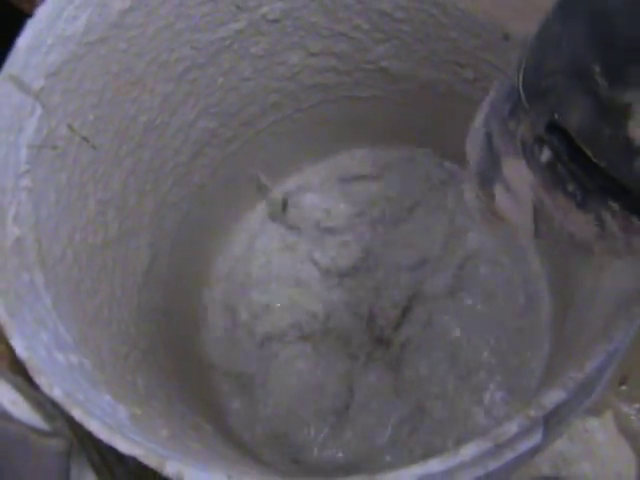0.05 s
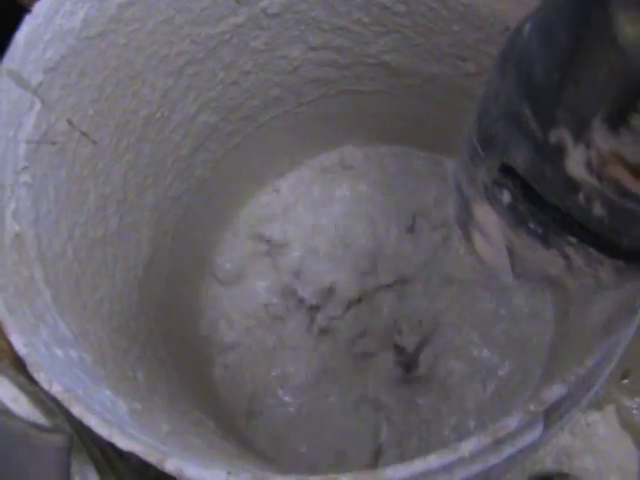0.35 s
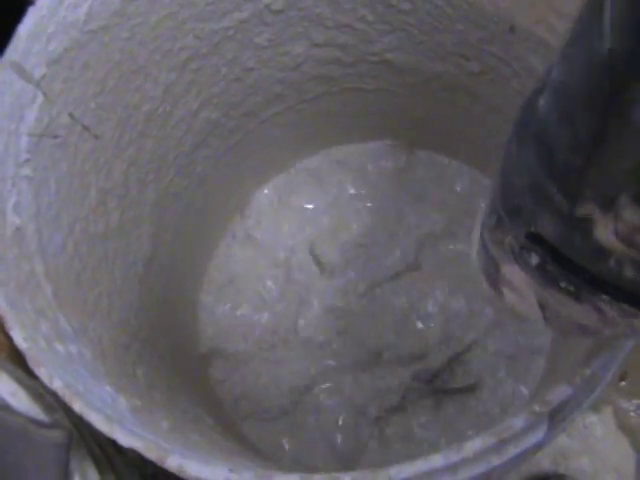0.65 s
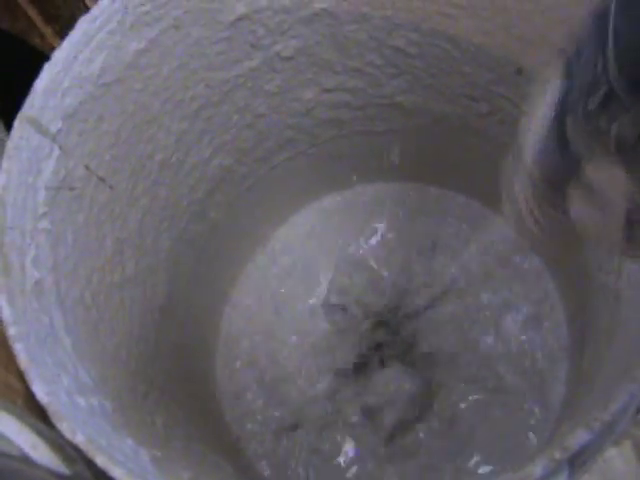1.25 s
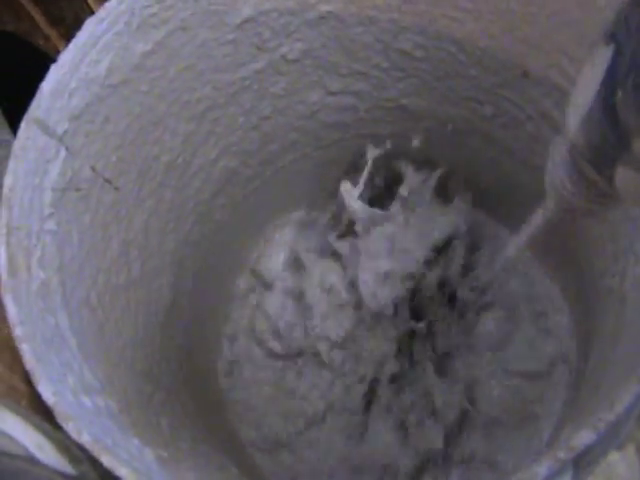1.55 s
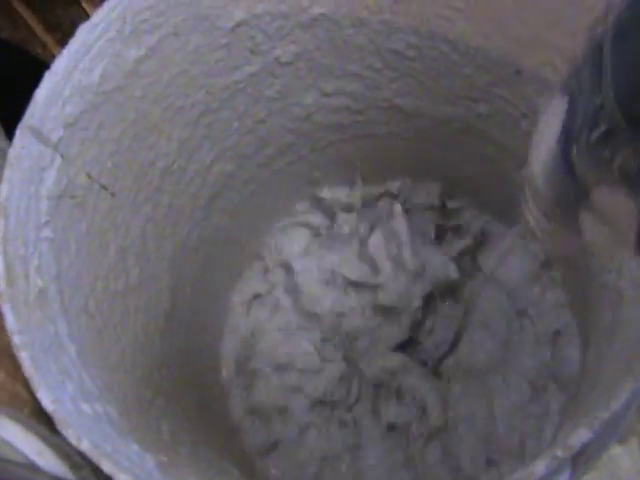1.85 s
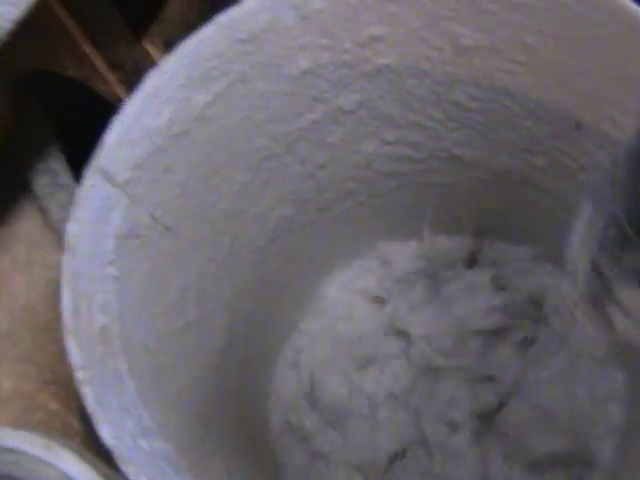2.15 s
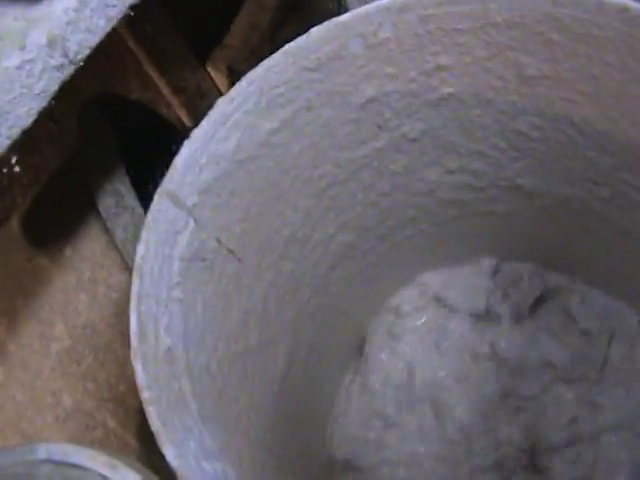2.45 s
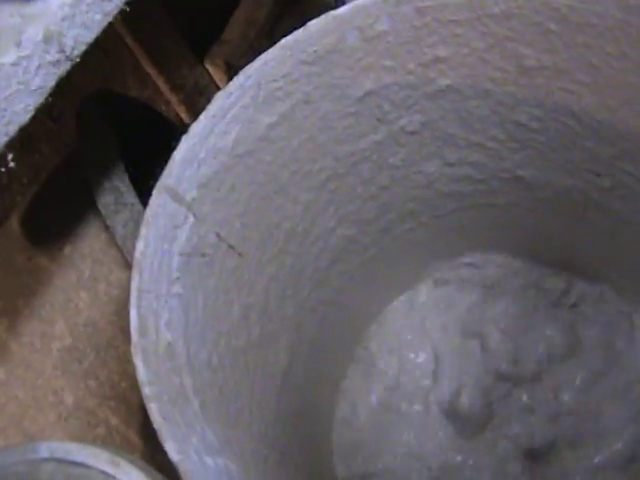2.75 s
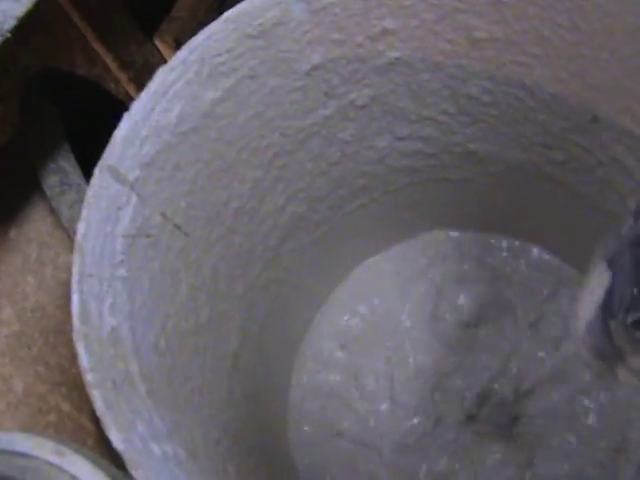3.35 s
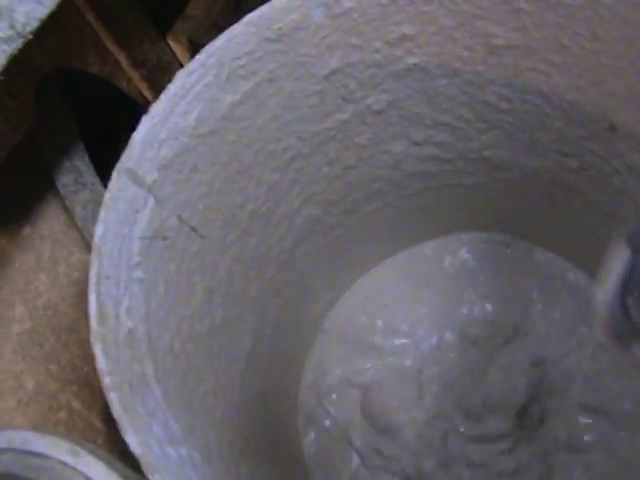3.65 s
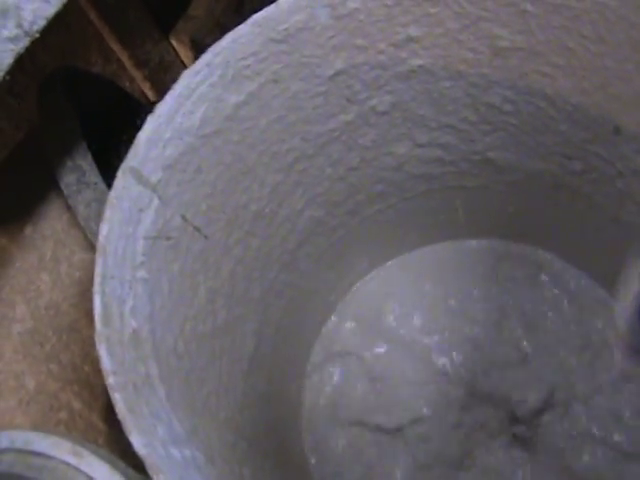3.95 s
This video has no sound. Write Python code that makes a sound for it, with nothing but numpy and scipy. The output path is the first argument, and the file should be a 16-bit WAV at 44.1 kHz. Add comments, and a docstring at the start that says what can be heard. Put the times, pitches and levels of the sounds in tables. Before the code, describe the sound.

Loud electric mixer humming and whining over the wet slops of thick glaze in a bucket.

```python
"""A steady motor hum with hiss and a pulsing gear whine, over booming and wet slops:
a hand-held electric mixer at full speed, stirring thick glaze in a plastic bucket.
Unbalance makes the hum; the fan hisses and whistles, and its air rings the housing.
The gears whine, buzz and rasp, binding at the same places in every turn of the paddle shaft.
The paddle keeps the bucket booming; air pockets open in the churned glaze as slops."""
import sys
import numpy as np
from scipy.fft import rfft, irfft
from scipy.io import wavfile
from scipy.ndimage import uniform_filter1d

SR = 44100
rng = np.random.default_rng(int(sys.argv[2]) if len(sys.argv) > 2 else 0)


def wav_record(signal):
    """Record a signal, one row per channel, as 16-bit PCM in the file named by sys.argv[1]."""
    frames = np.transpose(np.atleast_2d(signal))
    bounded = np.clip(frames, -1, 1)
    # unit amplitude maps onto the largest positive 16-bit level
    quanta = np.round(bounded * 32767).astype(np.int16)
    wavfile.write(sys.argv[1], SR, quanta)


N = 176400
T = np.arange(N) / SR
HZ = np.maximum(np.arange(N // 2 + 1) * SR / N, 1)
GEAR_RATIO, PINION_TEETH = 18.58, 9

# motor speed: time_s, speed_hz
MOTOR_SPEED = [(0, 379.3), (.2, 379.6), (.55, 381.3), (.8, 381.2), (1.1, 380.9), (1.4, 382.6),
               (1.75, 382.9), (1.95, 382.2), (2.25, 382.9), (2.8, 381.9), (3.3, 380), (3.6, 380.8),
               (4, 380.8)]
# hum lines: motor_multiple, shaft_multiple
HUM_ORDERS = [(0, 2), (0, 3), (0, 4), (1, 0), (2, -1), (2, 0), (2, 1), (3, 0)]
# same lines: level_db, pan_db (pan is left minus right throughout)
HUM_LEVELS = [(-62, 6), (-61, 17), (-62, 19), (-40.5, -18), (-42, -5.5), (-51, -21), (-42, -9), (-41.5, 9)]
# hum swell: time_s, gain_db
HUM_SWELL = [(0, 1), (.76, -1.5), (1.55, 3.5), (2.25, 1.5), (3.25, -2.5), (3.5, 0), (4, 1)]

# gear binds, main one first: place_turns, width_turns, whine_gain_db, rasp_share
BINDS = [(0.42, 0.059, 1, 0.13), (0.27, 0.047, -11, 0.17), (0.84, 0.068, -22, 0.26),
         (0.066, 0.088, -33, 0.25)]
# whine at the main bind: time_s, gain_db
WHINE_ENVELOPE = [(0, -21), (.3, -20), (.7, -22), (.95, -22), (1.25, -15.5), (1.85, -17), (2.2, -14.5),
                  (2.65, -17.5), (3.2, -22), (3.55, -19.5), (4, -23)]
# gearbox buzz: time_s, level_db
BUZZ_ENVELOPE = [(0, -23.5), (.5, -23.5), (1.1, -27), (1.7, -29.5), (2.4, -26.5), (3.1, -32), (4, -30)]
# gearbox resonances: pitch_hz, width_hz, gain_db
GEARBOX_MODES = [(3042, 58, -2), (3060, 180, -9), (3335, 250, -1), (3470, 200, -6), (4120, 360, -3)]
# gear rasp and fan hiss: time_s, gain_db
RASP_ENVELOPE = [(0, -14.5), (.35, -14), (.7, -14.5), (1.1, -14.5), (1.85, -14), (2.2, -15.5), (3.0, -15),
                 (3.6, -15), (4, -15)]
# their spectrum: freq_hz, gain_db
RASP_SPECTRUM = [(1410, -12), (2400, -5), (2830, -5.5), (2970, -4.5), (3210, -5.5), (3340, -5),
                 (3420, -1.5), (3560, -3.5), (3640, -3), (3760, -3.5), (4570, -4), (5390, -5.5),
                 (7500, -4.5), (10100, -11), (11600, -16.5), (13100, -17.5), (13800, -24), (14900, -23),
                 (15700, -22)]

# fan whistle: time_s, level_db
WHISTLE_ENVELOPE = [(0, -33), (.5, -30), (.65, -43), (1.15, -36), (1.33, -27.5), (1.55, -31), (1.8, -27),
                    (1.95, -36), (2.4, -48), (4, -46)]
# cooling air: time_s, gain_db
AIR_ENVELOPE = [(0.0, -22.5), (0.02, -22.5), (0.98, -22), (2.35, -22.5), (3.58, -21), (4.0, -23)]
# its spectrum: freq_hz, gain_db
AIR_SPECTRUM = [(470, -29), (800, -0.5), (910, -3.5), (977, 0.5), (1040, -2), (1130, -2.5), (1560, 1.5),
                (1800, -1), (1960, 0), (2170, -3.5), (2500, 2.5), (3250, -18), (5500, -120)]
# housing resonances: pitch_hz
HOUSING_HZ = [990, 1165, 1570, 2014, 5010, 7550, 15250]
# same resonances: width_hz, level_db, pan_db
HOUSING_MODES = [(43, -47.5, -14), (97, -36.5, -7), (250, -47, -19), (30, -36.5, -12), (70, -35.5, -12),
                 (600, -34, -2), (220, -52, 0)]

# bucket resonances: pitch_hz, width_hz, gain_db
BUCKET_MODES = [(138.3, 11.6, -16), (177.3, 14.7, -0.5), (196.1, 24, -5.5), (220.7, 15.4, -11.5)]
# bucket boom: time_s, gain_db
BOOM_ENVELOPE = [(0, -19.5), (.4, -21), (.8, -23), (1.3, -21.5), (1.8, -20.5), (2.2, -19), (2.6, -20.5),
                 (2.95, -23.5), (3.25, -17.5), (3.6, -21.5), (4, -21.5)]
# paddle bites (+) and slips (-): time_s, gain_db
SURGES = [(.1, 4), (.156, -4), (.185, 3), (.25, -4), (.284, 3), (.631, -16), (.882, 3), (.977, -11),
          (1.097, 5), (1.13, -2.5), (1.258, 4), (1.365, -5), (1.463, 5), (1.516, -5), (1.664, 5.5),
          (1.713, -4), (1.747, 4.5), (1.834, -9), (1.905, 5.5), (2.03, -8), (2.085, 3), (2.134, 6.5),
          (2.17, -3), (2.21, 6), (2.52, -6), (2.734, -10), (2.86, 4), (2.968, -3), (3.24, 4.5),
          (3.453, -3.5), (3.487, 3), (3.744, 7), (3.797, -4)]

# churning glaze: time_s, gain_db
CHURN_ENVELOPE = [(0, -33.5), (.8, -34), (1.3, -32), (1.7, -30.5), (2.1, -32.5), (2.5, -32.5), (2.75, -31),
                  (3.2, -33), (4, -31)]
# its spectrum: freq_hz, gain_db
CHURN_SPECTRUM = [(25, -26), (70, -20), (110, -11), (260, -1), (340, 0), (450, -2.5), (600, 0.5),
                  (800, -0.5)]
# large slops: start_s, pitch_hz, gain_db
LARGE_SLOPS = [(1.272, 600, -15), (1.5, 570, -13), (1.648, 520, -14), (1.752, 490, -13),
               (2.037, 560, -12.5), (2.077, 474, -14), (2.72, 315, -19), (2.728, 473, -17),
               (2.83, 620, -21), (2.883, 605, -21)]

# left-right likeness of noise: freq_hz, correlation
MIC_CORRELATION = [(60, .68), (160, .93), (270, .85), (360, .58), (550, .78), (850, .75), (1150, .93),
                   (1600, .91), (2600, .8), (4000, .91), (8500, .96), (9900, .92), (11000, .52),
                   (13000, .86), (14600, .35), (15700, .85)]
# balance of noise: freq_hz, pan_db
MIC_PAN = [(60, -1), (120, 24), (260, 0), (420, -6), (620, -3.5), (900, -9.5), (1900, -7), (3800, -4),
           (7500, -3), (10000, -0.5), (15000, -1)]
# left microphone's phase lead: freq_hz, lead_rad
MIC_LEAD = [(85, .4), (170, .1), (280, .15), (380, 1.6), (480, .5), (650, .4), (770, 1.2), (1020, .9),
            (1200, .45), (1800, .6), (2700, .3), (3450, .35), (6000, .15), (10000, -.1), (11000, -1.1),
            (12100, -2.9), (14000, -3.4), (15200, -6)]


def from_db(db):
    """Decibels to gain."""
    return 10 ** (np.asarray(db) / 20)


def unit_rms(x):
    """Scale to RMS 1."""
    return x / np.sqrt(np.mean(np.abs(x) ** 2) + 1e-20)


def in_time(rows):
    """Table value at every sample."""
    return np.interp(T, *np.transpose(rows))


def at_hz(rows):
    """Table value at every FFT bin."""
    hz, value = np.transpose(rows)
    return np.interp(np.log(HZ), np.log(hz), value)


def pan(db):
    """Left and right gains for a level difference."""
    half_db = np.atleast_1d(db) / 2
    return np.array([from_db(half_db), from_db(-half_db)])


def drift(corner_hz):
    """Low-passed random wander, RMS 1."""
    return unit_rms(irfft(rfft(rng.standard_normal(N)) / (1 + (HZ / corner_hz) ** 2), N))


def resonance(hz, width_hz):
    """Noise-driven, steep-sided resonance, RMS 1."""
    detune = (HZ ** 2 - hz ** 2) / (HZ * width_hz)
    return unit_rms(irfft(rfft(rng.standard_normal(N)) / (1 + 1j * detune / np.sqrt(2)) ** 2, N))


def rough_tone(cycles, jitter_rad, jitter_hz, flutter_db):
    """Sine with shaking phase and level, RMS 1."""
    flutter = from_db(flutter_db * drift(150))
    return unit_rms(flutter * np.sin(2 * np.pi * cycles + jitter_rad * drift(jitter_hz)))


def stereo_noise(spectrum, low_hz, high_hz):
    """Shaped noise band at the microphone pair, mid RMS 1."""
    mid, side = rfft(rng.standard_normal((2, N)))
    correlation = np.clip(at_hz(MIC_CORRELATION), -.95, .99)
    side = side * np.sqrt((1 - correlation) / (1 + correlation))
    gain = from_db(at_hz(spectrum)) / np.sqrt((1 + (low_hz / HZ) ** 16) * (1 + (HZ / high_hz) ** 16))
    noise = irfft(np.array([mid + side, mid - side]) * gain * pan(at_hz(MIC_PAN)), N)
    return noise / noise.mean(0).std()


def motor_hum(motor_turns, shaft_turns, waver_db=0.5):
    """Rotor and shaft unbalance: low multiples of both speeds, plus sidebands."""
    lines = 0
    for (motor_multiple, shaft_multiple), (db, pan_db) in zip(HUM_ORDERS, HUM_LEVELS):
        amplitude = np.sqrt(2) * from_db(db + waver_db * drift(1.7))
        cycles = motor_multiple * motor_turns + shaft_multiple * shaft_turns + rng.random()
        lines += pan(pan_db) * amplitude * np.sin(2 * np.pi * cycles)
    return from_db(in_time(HUM_SWELL)) * lines


def bind(shaft_turns, place_turns, width_turns):
    """Smooth load bump, once per shaft turn."""
    offset_turns = (shaft_turns - place_turns + .5) % 1 - .5
    return np.exp(-.5 * (offset_turns / width_turns) ** 2)


def gear_whine(motor_turns, shaft_turns, rise_hz=4, free_db=-38, uneven_db=1.5, pan_db=-8.5):
    """Pinion tooth tone rings the gear wheel; swells at each bind, slightly sharp at the main one."""
    load = sum(from_db(db) * bind(shaft_turns, place, width) for place, width, db, _ in BINDS)
    shaft_hz = np.mean(in_time(MOTOR_SPEED)) / GEAR_RATIO
    twist_cycles = rise_hz / (2 * np.pi * shaft_hz) * np.sin(2 * np.pi * (shaft_turns - BINDS[0][0]))
    tooth_cycles = PINION_TEETH * motor_turns + twist_cycles
    tone = rough_tone(tooth_cycles, jitter_rad=0.3, jitter_hz=70, flutter_db=1.5)
    drive = from_db(free_db) + from_db(in_time(WHINE_ENVELOPE) + uneven_db * drift(15)) * load
    wheel_hz, wheel_width_hz = 3444, 100
    wheel = 1 / (1 + 2j * (HZ - wheel_hz) / wheel_width_hz)
    return pan(pan_db) * irfft(rfft(drive * tone) * wheel, N)


def tooth_load(shaft_turns):
    """Gain on buzz and rasp: 1 running free, more at the binds."""
    return 1 + sum(share * bind(shaft_turns, place, width) for place, width, _, share in BINDS)


def gear_buzz(shaft_turns, pan_db=-7.5):
    """Rattling teeth ring the gearbox, harder at the binds."""
    ring = unit_rms(sum(from_db(db) * resonance(hz, width_hz) for hz, width_hz, db in GEARBOX_MODES))
    return pan(pan_db) * from_db(in_time(BUZZ_ENVELOPE)) * unit_rms(tooth_load(shaft_turns)) * ring


def gear_rasp(shaft_turns, trim_db=-0.61, grit_db=1.22, flutter_db=0.72):
    """Bright, gritty noise of gears, brushes and fan, pulsing with the shaft."""
    grit = from_db(grit_db * drift(400) + flutter_db * drift(46))
    pulse = unit_rms(tooth_load(shaft_turns) * grit)
    hiss = stereo_noise(RASP_SPECTRUM, low_hz=2470, high_hz=17000)
    return from_db(in_time(RASP_ENVELOPE) + trim_db) * pulse * hiss


def fan_whistle(motor_turns, motor_multiple=12, pan_db=-3):
    """Thin tone locked to motor speed."""
    tone = rough_tone(motor_multiple * motor_turns, jitter_rad=0.9, jitter_hz=30, flutter_db=2.5)
    return pan(pan_db) * from_db(in_time(WHISTLE_ENVELOPE)) * tone


def housing_air(trim_db=-0.5, flutter_db=1.13):
    """Cooling air rushes through the housing and rings its resonances."""
    flow = from_db(in_time(AIR_ENVELOPE) + trim_db + flutter_db * drift(45))
    rush = flow * stereo_noise(AIR_SPECTRUM, low_hz=784, high_hz=2370)
    ring = sum(pan(pan_db) * from_db(db) * resonance(hz, width_hz)
               for hz, (width_hz, db, pan_db) in zip(HOUSING_HZ, HOUSING_MODES))
    return rush + ring


def bucket_boom(shaft_turns, trim_db=-2.0, surge_width_s=.016, low_cut_hz=126, pan_db=8):
    """The paddle drives the bucket's low modes, surging as it bites; deep bass does not radiate."""
    ring = unit_rms(sum(from_db(db) * resonance(hz, width_hz) for hz, width_hz, db in BUCKET_MODES))
    power = uniform_filter1d(ring ** 2, size=3000)
    ring = unit_rms(ring / power ** 0.29)  # partly evens out random swells
    surge_db = sum(db * np.exp(-.5 * ((T - time_s) / surge_width_s) ** 2) for time_s, db in SURGES)
    push = 1 - 0.092 * np.cos(2 * np.pi * (shaft_turns - 0.47))  # eases once a turn
    wall = from_db(in_time(BOOM_ENVELOPE) + surge_db + trim_db) * push * ring
    return pan(pan_db) * irfft(rfft(wall) / np.sqrt(1 + (low_cut_hz / HZ) ** 10), N)


def glaze_churn(trim_db=2.5, lump_db=1.5):
    """Low, lumpy wash of stirred glaze."""
    gain = from_db(in_time(CHURN_ENVELOPE) + trim_db + lump_db * drift(37))
    return gain * stereo_noise(CHURN_SPECTRUM, low_hz=20, high_hz=785)


def slop(start_s, pitch_hz, gain_db, decay_s=0.035, decay_db=38, chirp=0.15, width_hz=90):
    """An air pocket opens: a short, damped, rising note, its pitch shaken by the wet skin."""
    age = np.arange(int(3 * decay_s * SR)) / SR / decay_s  # in decay times
    shake_rad = np.cumsum(rng.standard_normal(len(age))) * np.sqrt(2 * np.pi * width_hz / SR)
    sweep_rad = 2 * np.pi * pitch_hz * decay_s * (age + chirp * age ** 2)
    envelope = from_db(gain_db - decay_db * age) * (1 - np.exp(-15 * age))
    note = envelope * np.sin(sweep_rad + uniform_filter1d(shake_rad, size=90))
    return np.pad(note, (int(start_s * SR), N))[:N]


def glaze_slops(small_count=70, small_gain_db=13.5, spread_db=10):
    """A few large slops, plus small random ones whose level follows the churning."""
    loudest_db = in_time(CHURN_ENVELOPE) + small_gain_db
    small = [(when * N / SR, 330 * 3 ** pitch, loudest_db[int(when * N)] - spread_db * softness)
             for when, pitch, softness in rng.random((small_count, 3))]  # 330-990 Hz
    return sum(slop(*row) for row in list(LARGE_SLOPS) + small)


def scene():
    """The motor turns the paddle shaft through the gearbox; mixer, bucket and glaze sum in stereo."""
    motor_turns = np.cumsum(in_time(MOTOR_SPEED) + 0.06 * drift(8)) / SR
    shaft_turns = motor_turns / GEAR_RATIO
    gears = gear_whine(motor_turns, shaft_turns) + gear_buzz(shaft_turns) + gear_rasp(shaft_turns)
    mixer = motor_hum(motor_turns, shaft_turns) + gears + fan_whistle(motor_turns) + housing_air()
    return mixer + bucket_boom(shaft_turns) + glaze_churn() + glaze_slops()


def record(dry, cutoff_hz=15800):
    """Two microphones, out of phase by frequency; peaks clipped, top cut steeply."""
    phase_shift = np.exp(.5j * np.outer([1, -1], at_hz(MIC_LEAD)))
    clipped = np.clip(irfft(rfft(dry) * phase_shift, N), -1, 1)
    return irfft(rfft(clipped) / np.sqrt(1 + (HZ / cutoff_hz) ** 400), N)


dry = scene()
out = record(dry)
wav_record(out)
```